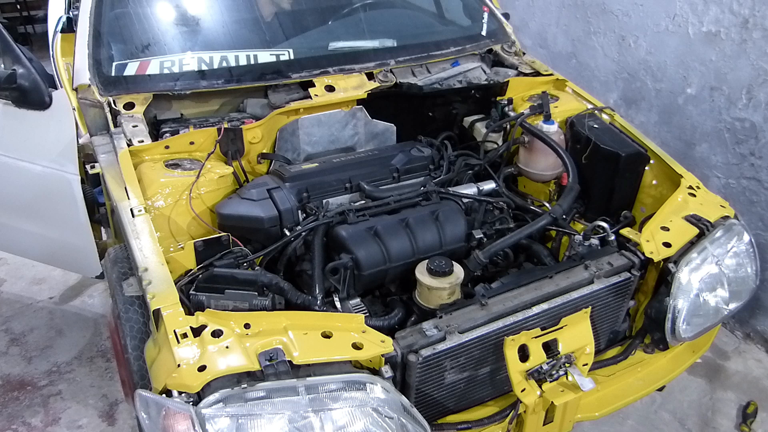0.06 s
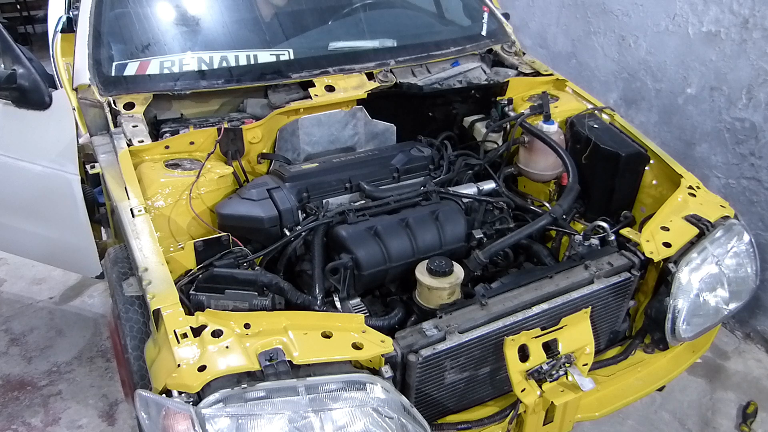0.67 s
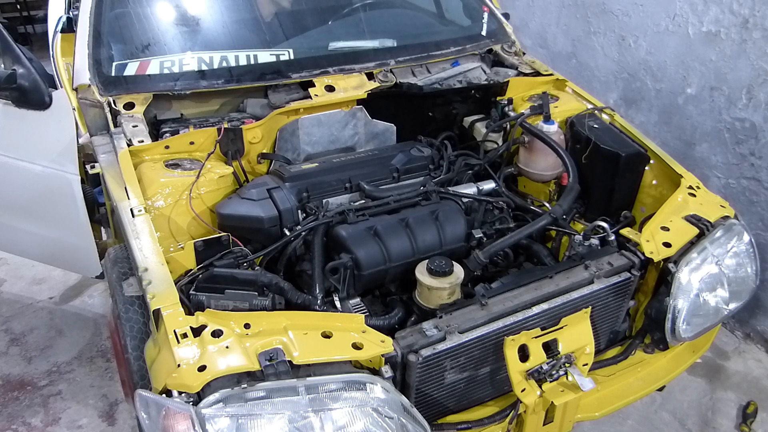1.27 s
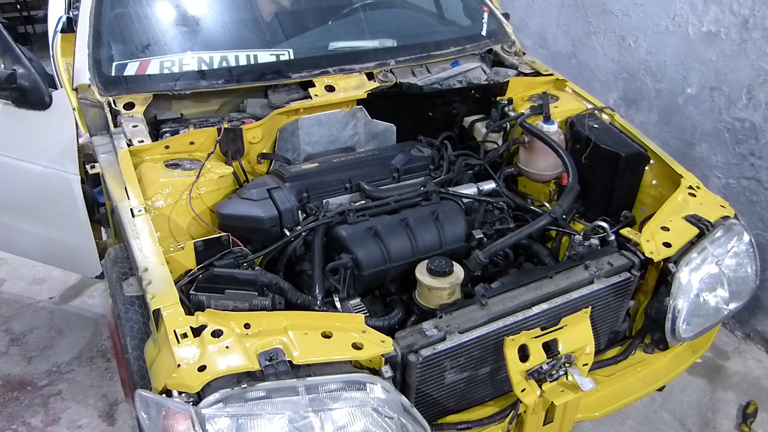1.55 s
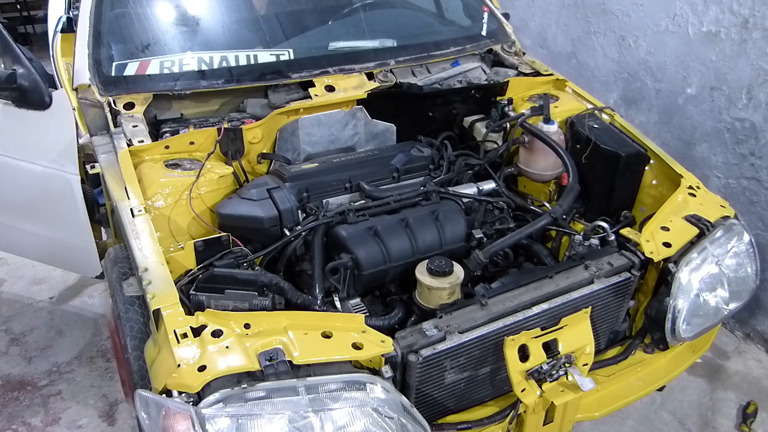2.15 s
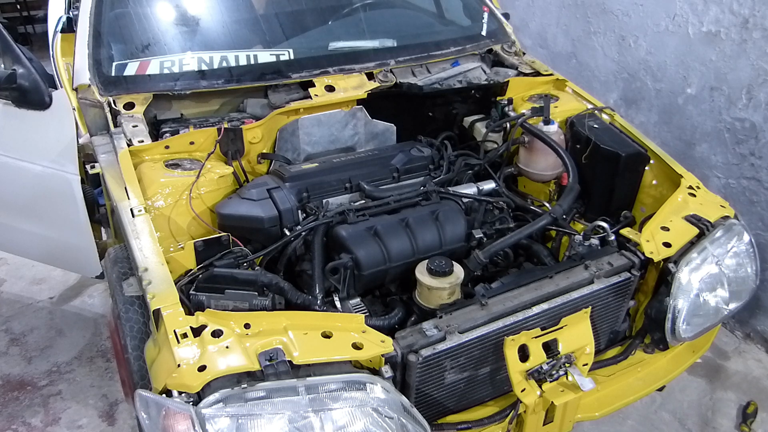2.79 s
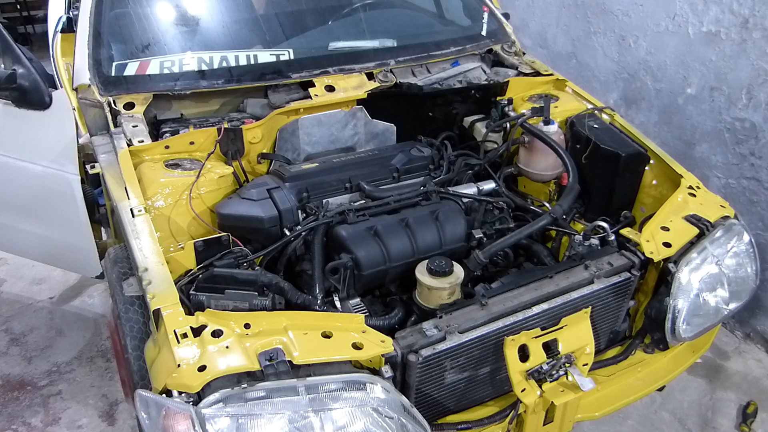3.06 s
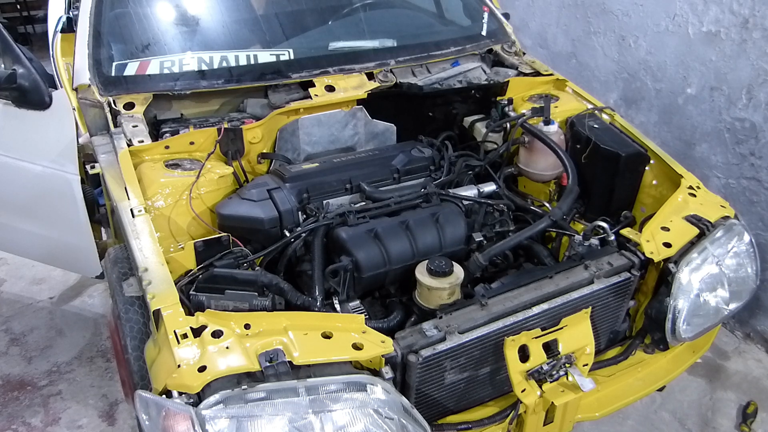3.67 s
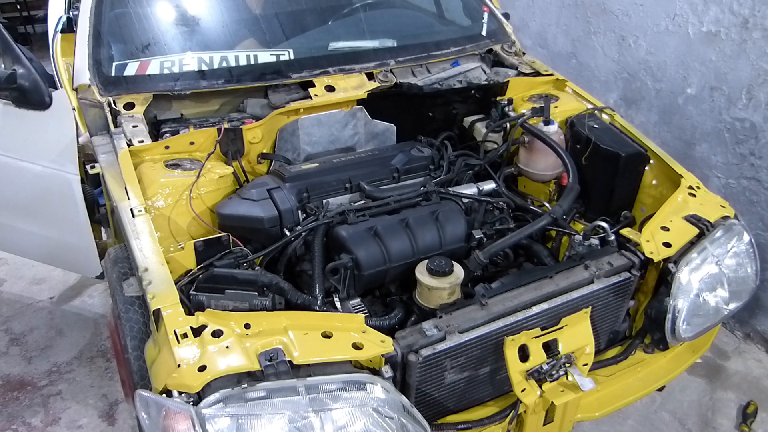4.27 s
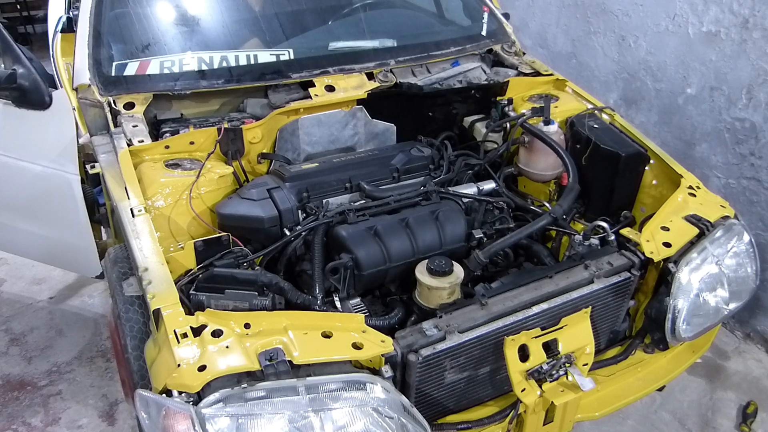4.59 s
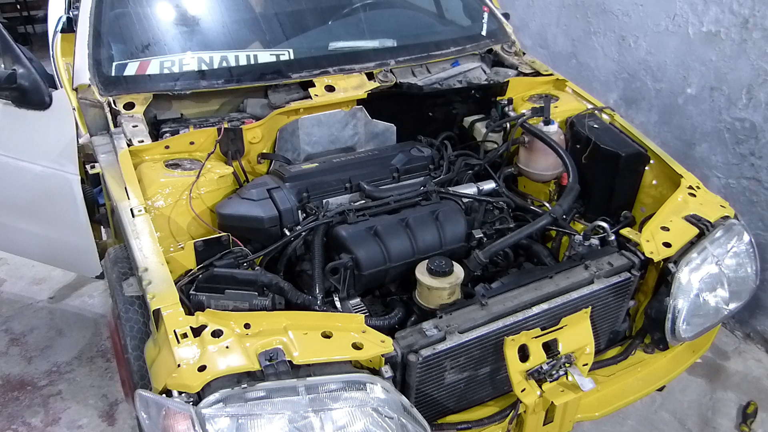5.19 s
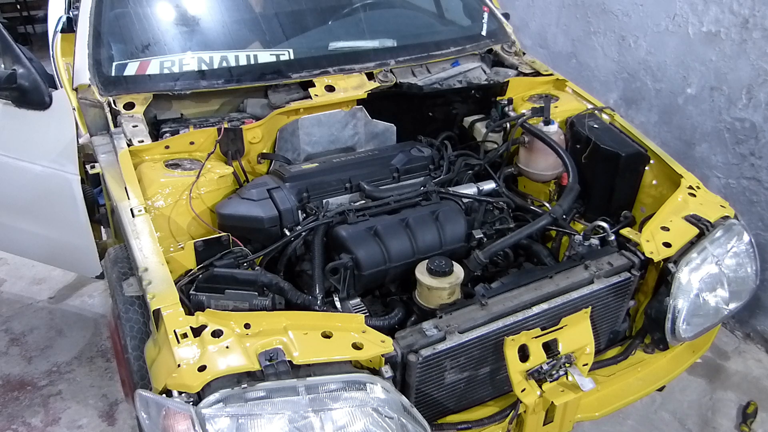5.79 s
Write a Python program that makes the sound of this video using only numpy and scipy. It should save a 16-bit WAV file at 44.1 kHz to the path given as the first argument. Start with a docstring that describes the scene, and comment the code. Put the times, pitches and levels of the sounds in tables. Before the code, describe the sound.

A car's starter motor cranks with a fast, even pulsing whine, winds down, then cranks again after a clunk, the engine never firing.

```python
"""A starter motor cranks a four-cylinder petrol engine in a garage, bonnet off; it never fires.
Each compression loads the gears: the teeth clash, and their whine sags with the speed before they run
light again. Tooth contact is the excitation; fixed peaks of the starter and its nearby echoes colour it.
The key is let go, the starter coasts and the engine rocks to rest, ringing its block. A relay clunks,
the fuel pump hums, and cranking starts again. The garage adds a short reverberation."""
import sys
import numpy as np
from scipy import signal
from scipy.fft import rfft, irfft, next_fast_len
from scipy.io import wavfile
from scipy.ndimage import uniform_filter1d, minimum_filter1d, map_coordinates

SR = 44100
rng = np.random.default_rng(int(sys.argv[2]) if len(sys.argv) > 2 else 0)


def wrap_up_sound(samples):
    """Save the sound to the file named by the first command line argument, as 16-bit audio."""
    columns = np.atleast_2d(samples).T
    # keep every value between -1 and 1, then stretch to whole-number steps
    tamed = np.clip(columns, -1, 1)
    steps = np.round(tamed * 32767).astype(np.int16)
    wavfile.write(sys.argv[1], SR, steps)


N = 266364
TIME = np.arange(N) / SR
SWITCH_ON_S = 5.239  # the starter is powered again

# turns of the key: (first compression [s], end [s], stroke period [s], strain of starting from rest [0-1])
KEY_TURNS = [(-.049, 3.42, .10545, 0), (5.498, 6.04, .1105, 1)]
# cylinders in order of compression: (clash level [dB], whine level [dB])
CYLINDER_LEVELS = [(-14.4, -19.2), (-14.2, -18.6), (-14.4, -19.2), (-14.1, -19.4)]
# fixed narrow ringing peaks of the starter and its nearby echoes: (frequency [Hz], width [Hz], lift [dB])
RINGING_PEAKS = [(295, 70, 3.5), (395, 50, 4.5), (576, 61, 4.5), (690, 60, 4.5), (785, 70, 4),
                 (1355, 50, 6), (2218, 24, 9), (2353, 24, 10), (2492, 20, 10), (2563, 30, 8), (2789, 36, 6),
                 (2993, 36, 4), (3165, 36, 5), (4124, 54, 7), (4570, 70, 2), (4726, 44, 5), (4829, 44, 9),
                 (4971, 25, 5), (5200, 40, 4), (5324, 44, 6), (5652, 36, 4), (6056, 26, 7), (7750, 50, 6),
                 (9370, 34, 9)]


def cranking():
    """Periodic loading: each compression slows the starter and modulates the level of its gear sounds."""
    # course of a stroke: (time since take-up [s], clash level [dB], whine level [dB], whirr level [dB])
    stroke_levels = [(0, -7.5, -2, -5.5), (.007, -1, 1, 2), (.018, -.5, -2, 1.5), (.028, -4, -3, 0.5),
                     (.042, -9.5, -2.5, 0.5), (.056, -9.5, -9.5, 1.5), (.07, -18.5, -7, 1),
                     (.088, -15, -21, 0), (.15, -20, -25, 5.5)]
    # slowing and recovery under load: (time since take-up [s], speed [ratio])
    speed_sag = [(0, 1.11), (.006, 1.08), (.016, 1.025), (.027, .985), (.04, .93), (.052, .88), (.066, .98),
                 (.085, .98), (.1, 1.02)]
    strokes = compressions()
    current = np.clip(np.searchsorted(strokes[0], TIME) - 1, 0, strokes.shape[1] - 1)
    start, cylinder, strain, count = strokes[:, current]
    whine_scatter, speed_scatter, clash_scatter = rng.standard_normal((strokes.shape[1], 3))[current].T
    age = (TIME - start) / (1 + .23 * strain)  # strain draws the stroke out
    engaged = np.interp(age, [.11, .15], [1, 0])  # the load fades when no further stroke follows

    clash_db, whine_db, whirr_db = curves(stroke_levels, age)
    cylinder_clash_db, cylinder_whine_db = np.array(CYLINDER_LEVELS)[cylinder.astype(int)].T
    clash_db += cylinder_clash_db - .05 * count + .7 * clash_scatter  # softens from stroke to stroke
    piston_climb = np.interp(age, [.01, .046, .058, .068], [0, 1, 1, 0])
    whine_db += cylinder_whine_db + strain * (11 * piston_climb - 4.5) + .15 * whine_scatter

    motor_hz, motor_whirr, motor_whine, slack = starter_motor(strain)
    drag = .16 * strain * np.minimum(age / .04, 1)  # share of speed lost to strain
    speed_change = curves(speed_sag, age)[0] - 1 - drag + .012 * speed_scatter
    pitch_hz = motor_hz * (1 + engaged * speed_change)
    mesh_hz = .28 * pitch_hz  # ring gear teeth pass more slowly than the reduction gear's
    clash = tooth_clash(mesh_hz, engaged * amp(clash_db))
    whirr = pinion_whirr(mesh_hz, engaged * whirr_db, motor_whirr, slack)
    whine = gear_whine(pitch_hz, np.hypot(engaged * amp(whine_db), motor_whine), slack, strain)
    return clash + whirr + whine + brush_squeal(age, engaged)


def compressions():
    """A near-periodic beat, slow at first from rest: start [s], cylinder, strain, count of each stroke."""
    tiring_s, strain_lag_s = .000056, .0295  # the tiring battery and the strain lengthen the period
    count = np.arange(40)
    turns = []
    for first, end, period, from_rest in KEY_TURNS:
        strain = from_rest * .2 ** count
        gaps = period + tiring_s * count + strain_lag_s * strain
        starts = first + np.cumsum(gaps) - gaps
        turns.append(np.array([starts, count % len(CYLINDER_LEVELS), strain, count])[:, starts < end])
    return np.hstack(turns)


def starter_motor(strain):
    """Rotor inertia: the motor coasts and spins up gradually. Gives pitch, whirr, whine and tooth slack."""
    # whirr while coasting: (time [s], level [dB])
    coast_levels = [(3.4, -16), (3.44, -19), (3.52, -27.5), (3.59, -27), (3.79, -30.5), (3.89, -38.5),
                    (4.13, -39), (4.39, -46), (4.6, -55.5), (5.23, -80)]
    # the spin-up whine swells, then recedes as the load nears: (time [s], relative level [dB])
    spin_swell = [(5.24, -30), (5.31, -12), (5.36, -1), (5.41, 0), (5.44, -4), (5.5, -3)]
    crank_hz, spin_hz, coast_hz_per_s, spin_up_s = 1264.5, 1550, 780, .06
    released, taken_up = KEY_TURNS[0][1], KEY_TURNS[1][0]
    coasting = (TIME > released) & (TIME <= SWITCH_ON_S)
    spinning = (TIME > SWITCH_ON_S) & (TIME < taken_up)
    by_state = lambda coast, spin, crank: np.select([coasting, spinning], [coast, spin], crank)
    powered_s = np.clip(TIME - SWITCH_ON_S, 0, taken_up - SWITCH_ON_S)
    speed = 1 - np.exp(-powered_s / spin_up_s)
    coast_hz = np.maximum(crank_hz - coast_hz_per_s * (TIME - released), 300)
    coast_whirr = amp(curves(coast_levels)[0])
    pitch_hz = by_state(coast_hz, spin_hz * speed, crank_hz)
    whirr = by_state(coast_whirr, speed * amp(-25.5 + 19 * powered_s), amp(-19.5 - 2 * strain))
    whine = by_state(coast_whirr * amp(-15), amp(-26.5 + curves(spin_swell)[0]), amp(-34.5))
    slack = by_state(coast=.55, spin=1, crank=0)
    return pitch_hz, whirr, whine, slack


def tooth_clash(mesh_hz, level):
    """Impact excitation: loaded teeth strike at the mesh rate and excite the fixed ringing peaks."""
    # clash spectrum: (frequency [Hz], relative density [dB])
    spectrum = [(60, -74), (215, -18.5), (300, -7.5), (600, -4.5), (1200, 3.5), (1900, 1), (3300, 4),
                (5000, 3), (7000, 1), (8500, -3), (10500, -10), (12500, -18), (15500, -53)]
    strikes = noise() * tooth_pulses(mesh_hz, decay_db=-1.5, scatter_db=1.1)
    return driven(strikes, level, spectrum, RINGING_PEAKS)


def pinion_whirr(mesh_hz, stroke_db, level, slack):
    """Forced vibration: tooth noise rings the pinion, more clearly when it runs unloaded."""
    # whirr spectra, driving and unloaded: (frequency [Hz], relative density [dB])
    loaded_spectrum = [(60, -62), (210, -18.5), (300, -4.5), (700, -4.5), (1500, 0), (2500, 0), (3400, -1),
                       (5000, 0), (6800, 2), (8500, -6), (10500, -13), (12500, -28), (15500, -35)]
    free_spectrum = [(60, -38), (190, -19), (330, -1), (700, 1), (1500, 5.5), (2400, 3.5), (3000, 5),
                     (5000, 3), (6800, 4.5), (8500, -1.5), (10500, -9), (12500, -25), (15500, -31)]
    # pinion resonances, driving and unloaded: (frequency [Hz], bandwidth [Hz], lift [dB])
    loaded_modes = [(720, 160, 4), (1400, 160, 1), (3450, 450, -3), (4150, 170, 4), (4400, 150, -2),
                    (4760, 220, 4), (7200, 50, 3), (7564, 22, 7)]
    free_modes = [(730, 140, 3), (1600, 260, 3), (3500, 500, -4), (4130, 130, 5), (4430, 200, -3),
                  (4820, 190, 6), (6200, 160, 4), (7180, 160, 6)]
    rasp = noise() * tooth_pulses(2 * mesh_hz, decay_db=2.5, scatter_db=.1)
    rasp *= amp(stroke_db + 1.35 * wobble(40))
    loaded = driven(rasp, level * (slack == 0), loaded_spectrum, loaded_modes)
    free = driven(rasp, level * (slack > 0), free_spectrum, free_modes)
    return loaded + free


def tooth_pulses(rate_hz, decay_db, scatter_db):
    """Amplitude modulation: each tooth has its own force, which ramps by -decay_db until the next."""
    passed = np.cumsum(rate_hz * (1 + .06 * wobble(150))) / SR
    force_db = scatter_db * rng.standard_normal(N // 8)
    return unit(amp(force_db[passed.astype(int)] - decay_db * (passed % 1)))


def gear_whine(pitch_hz, level, slack, strain):
    """Gear-mesh tones sweep through the fixed ringing peaks; slack teeth rasp and lose overtones."""
    # partials of the reduction gear: (frequency [multiple of the pitch], relative level [dB])
    partials = [(1, -7), (2, 4.5), (3, -12), (3.76, -2.5), (5, -9)]
    # how the starter radiates the whine: (frequency [Hz], relative gain [dB])
    radiation = [(500, 0), (1100, -4), (1400, 2.5), (1750, 1), (2000, 2), (2300, .8), (2550, -1), (2800, 1),
                 (3050, -1.5), (4100, 0), (4400, -3), (4650, -.5), (4830, 1), (5250, 1), (5700, -3),
                 (9000, -8)]
    gear_teeth, runout_rad, runout_depth = 9, .3, .5  # the gear runs out of true once per turn
    backlash = 1 + (.022 + .055 * slack + .03 * np.sqrt(strain)) * wobble(520) + .005 * wobble(25)
    phase = 2 * np.pi * np.cumsum(pitch_hz * backlash) / SR
    shaft_angle = phase / gear_teeth + wobble(60)
    phase += runout_rad * (1 + 2 * slack + strain) * np.sin(shaft_angle)
    tone = np.zeros(N)
    for order, db in partials:
        strength = amp(db - 24 * slack * (order > 1) + 2.5 * wobble(300) + 1.5 * wobble(25))
        tone += strength * np.sin(order * phase + .3 * wobble(160))
    tone *= 1 + runout_depth * np.cos(shaft_angle)
    tone /= np.sqrt(np.abs(uniform_filter1d(tone ** 2, size=1024)) + 1e-9)  # evens out slow swells
    milder_peaks = [(hz, width, .8 * db) for hz, width, db in RINGING_PEAKS]
    tone = driven(tone, level, radiation, milder_peaks)
    return .95 * tone + .3 * reverberation(tone, [(1000, .03), (8000, .02)], length=4096)


def brush_squeal(age, engaged):
    """Narrow-band noise: the brushes squeal thinly, most as the load lets go."""
    # squeal spectrum: (frequency [Hz], relative density [dB])
    spectrum = [(6300, -60), (6640, -18), (6662, 0), (6685, -18), (7000, -60)]
    swell = np.interp(age, [.035, .05, .08, .1], [.4, 1, 1, .4])
    return engaged * swell * amp(-34.5 + 2 * wobble(5)) * unit(colour(noise(), spectrum))


def take_up_knocks():
    """Backlash: the teeth knock together just before they take up each load."""
    lead_s, db, rise_s, t60_s, tilt_db = .004, -23.5, .002, .07, -1
    return impacts([(s - lead_s, db, rise_s, t60_s, tilt_db, 0) for s in compressions()[0] if s > 0])


def booms():
    """Low resonances as Gaussian tone bursts: each cylinder chugs in its own way, and the body bumps."""
    # block and intake, a list per cylinder: (frequency [Hz], time since take-up [s], width [s], level [dB])
    cylinder_booms = [
        [(172.4, 0.0178, 0.02, -42.5), (283, 0.0217, 0.012, -35), (125, .07, 0.026, -48)],
        [(293, 0.016, 0.012, -35), (309, .046, 0.014, -36)],
        [(176, 0.0237, 0.015, -40.5), (290, 0.02403, 0.019, -35)],
        [(124, 0.0274, 0.019, -45), (315, 0.034, 0.019, -46)],
    ]
    # dull bumps of the car's body: (time [s], frequency [Hz], width [s], level [dB])
    body_bumps = [(2.115, 62, .016, -49), (3.52, 66, .022, -50)]
    bursts = list(body_bumps)
    for start, cylinder, strain, _ in compressions().T:
        for hz, delay, width, db in cylinder_booms[int(cylinder)]:
            bursts.append((start + delay, hz, width, db - 10 * strain))
    out = np.zeros(N)
    for peak_s, hz, width, db in bursts:
        louder, higher, phase = rng.standard_normal(3)
        near = np.abs(TIME - peak_s) < 3 * width
        t = TIME[near] - peak_s
        tone = np.sqrt(2) * np.sin(2 * np.pi * (hz * (1 + .025 * higher) * t + phase))
        out[near] += amp(db + louder) * np.exp(-(t / width) ** 2) * tone
    return out


def engine_rocking():
    """Damped free vibration: the engine rocks to rest, and each blow rings its block."""
    # blows: (time [s], level before the block [dB], decay time t60 [s])
    rocks = [(3.622, -21, 0.39), (3.705, -27, 0.28), (3.86, -24.5, 0.63), (4.085, -32, 0.32),
             (4.128, -36.5, 0.43)]
    # broad response of the block: (frequency [Hz], gain [dB])
    block_response = [(100, 11), (220, -4), (400, -1.5), (1000, -8), (3000, 1.5), (9000, 3.5)]
    # resonances of the block: (frequency [Hz], bandwidth [Hz], lift [dB])
    block_modes = [(380, 80, 5), (665, 130, 4), (1120, 70, 3), (1370, 40, 4), (1590, 70, 5), (1830, 50, 4),
                   (2145, 45, 7), (2330, 40, 6), (3070, 70, 7), (3810, 50, 4), (4130, 70, 6), (4780, 80, 5)]
    rise_s, tilt_db, ring_db = .01, -1.46, 4.5
    blows = impacts([(s, db, rise_s, t60, tilt_db, ring_db) for s, db, t60 in rocks])
    return colour(blows, block_response, block_modes)


def drive_squeals():
    """The drive groans and squeals as the engine rocks back: glides roughened by frequency modulation."""
    # (time [s], duration [s], first pitch [Hz], last pitch [Hz], roughness [share of pitch], level [dB])
    glides = [(3.535, 0.085, 4780, 4830, .024, -32), (3.545, .07, 1540, 1620, .07, -35),
              (3.625, 0.075, 1570, 1640, .06, -33), (3.625, 0.09, 720, 660, .13, -33.5),
              (3.695, 0.08, 1970, 2220, 0.08, -30), (3.74, .1, 2320, 2335, .03, -41),
              (3.865, 0.12, 700, 640, .14, -39), (3.98, .5, 4150, 4110, .012, -51)]
    out = np.zeros(N)
    for start, duration, first_hz, last_hz, roughness, db in glides:
        progress = np.clip((TIME - start) / duration, 0, 1)
        hz = (first_hz + (last_hz - first_hz) * progress) * (1 + roughness * wobble(500))
        tone = np.sin(2 * np.pi * np.cumsum(hz) / SR) * amp(1.5 * wobble(300))
        out += amp(db) * np.sin(np.pi * progress) * unit(tone)
    return out


def switch_clunks():
    """Impact transients: the relays and the starter solenoid snap over."""
    # (time [s], level [dB], rise [s], decay time t60 [s], tilt [dB/octave], panel ring [dB])
    clunks = [(4.593, -30, 0.002, 0.3, -2, 10), (4.602, -32, 0.0049, 0.14, -5, 17),
              (4.753, -40.5, .0033, 0.23, 16, 0), (4.765, -37, .01, 0.24, -6.5, -2),
              (5.24, -11.5, 0.01, 0.21, 3.5, 0.5)]
    return impacts(clunks)


def impacts(rows):
    """Exponential decay: heavy metal parts clatter in bursts of noise; some ring the body panel."""
    # spectrum of a knock: (frequency [Hz], relative density [dB])
    spectrum = [(50, -50), (130, -12.5), (300, -3.5), (800, 2.5), (1300, 5.5), (2100, 0.5), (3200, -5.5),
                (6000, -2.5), (9000, -11), (12000, -28.5), (15500, -41)]
    # resonances of the body panel: (frequency [Hz], bandwidth [Hz], share of the ring [0-1])
    panel_modes = [(215, 40, .8), (834, 200, 1), (1740, 160, .6), (2250, 400, .6)]
    out = np.zeros((2, N + SR))
    size = SR // 2
    t = np.arange(size) / SR
    hz = np.fft.rfftfreq(size, 1 / SR)
    octaves = np.log2(np.clip(hz, 120, 9000) / 1000)
    panel = sum(share / (1 + (2 * (hz - centre) / width) ** 2) for centre, width, share in panel_modes)
    rattle = noise() * amp(.88 * wobble(250))
    for s, db, rise, t60, tilt_db, ring_db in rows:
        span = slice(round(s * SR), round(s * SR) + size)
        gain = amp(along(spectrum, hz) + tilt_db * octaves + ring_db * panel)
        body = unit(irfft(rfft(rattle[:, span], size) * gain, size))
        envelope = np.minimum(t / rise, 1) * amp(db - 60 * np.maximum(t - rise, 0) / t60)
        out[:, span] += body * envelope
    return out[:, :N]


def fuel_pump():
    """Flow noise and tones: the pump hums, and fuel rushes and whistles thinly as it primes the rail."""
    # rush of fuel: (frequency [Hz], relative density [dB])
    rush_spectrum = [(40, -29), (72, -5), (100, -7), (140, -16), (220, 1.5), (400, -2.5), (700, 2.5),
                     (1100, 3.5), (1900, -3.5), (3000, -12), (4700, -10), (7000, -19), (10000, -27),
                     (15000, -61)]
    # low hums while the starter is off: (start [s], end [s], frequency [Hz], level [dB])
    hums = [(3.68, 4.26, 114, -50), (4.28, 4.8, 145, -55.5), (4.36, 4.92, 86, -59),
            (4.95, 5.25, 145, -49.5)]
    prime_s, ramp_s = 4.57, .032
    whistle_s, settle_s, whistle_hz = 4.83, .05, 4715
    running = lambda start, end: np.clip(np.minimum(TIME - start, end - TIME) / ramp_s + .5, 0, 1)
    out = running(prime_s, SWITCH_ON_S) * amp(-42.5) * unit(colour(noise(), rush_spectrum))
    for start, end, hz, db in hums:
        phase = 2 * np.pi * np.cumsum(hz * (1 + .025 * wobble(24))) / SR
        out += running(start, end) * amp(db) * unit(np.sin(phase) * amp(2.5 * wobble(16)))
    settled = 1 - np.exp(-np.maximum(TIME - whistle_s, 0) / settle_s)
    phase = 2 * np.pi * np.cumsum(whistle_hz * (1 - .08 * (1 - settled) + .006 * wobble(300))) / SR
    whistle = amp(-64) * unit(np.sin(phase)) + amp(-79) * unit(np.sin(3 * phase))
    return out + settled * (TIME < SWITCH_ON_S) * whistle


def reverberation(x, t60s, length):
    """Diffuse field: convolution with a stereo noise tail in which each frequency dies at its own rate."""
    hz, t, bins = signal.stft(rng.standard_normal((2, length)), SR, nperseg=256)
    tail = signal.istft(bins * amp(-60 * t / along(t60s, hz)[:, None]), SR, nperseg=256)[1]
    return signal.fftconvolve(np.atleast_2d(x), tail / np.linalg.norm(tail[0]), axes=1)[:, :N]


def background():
    """Stationary noise: the quiet, dull ambience of the garage."""
    # ambient spectrum: (frequency [Hz], relative density [dB])
    spectrum = [(20, -2), (45, -27), (75, -15), (130, -8.5), (250, -5.5), (700, -4.5), (1500, -10),
                (3000, -24), (8000, -30), (15000, -58)]
    return amp(-41.5) * unit(colour(noise(), spectrum))


def driven(x, level, spectrum, peaks):
    """Source and filter: an excitation at a moving level is coloured; the rms of that level is kept."""
    return unit(colour(x * level, spectrum, peaks)) * np.sqrt(np.mean(level ** 2))


def colour(x, spectrum, peaks=()):
    """Minimum-phase filter: a smooth spectrum lifted by ringing peaks."""
    size = 2 * next_fast_len(N // 2 + 8192)
    hz = np.fft.rfftfreq(size, 1 / SR)
    lift = sum((amp(db) ** 2 - 1) / (1 + (2 * (hz - centre) / width) ** 2) for centre, width, db in peaks)
    gain = amp(along(spectrum, hz)) * np.sqrt(np.maximum(1 + lift, 1e-3))
    cepstrum = irfft(np.log(gain + 1e-6))
    cepstrum[1:size // 2] *= 2  # folding the cepstrum makes the filter causal
    cepstrum[size // 2 + 1:] = 0
    return irfft(rfft(x, size) * np.exp(rfft(cepstrum)), size)[..., :N]


def noise():
    """Partial coherence: white stereo noise, partly shared by left and right."""
    # left-right likeness: (frequency [Hz], correlation [0-1])
    correlation = [(60, 0.92), (120, 0.84), (240, 0.87), (480, 0.6), (950, 0.74), (1890, 0.87),
                   (3770, 0.89), (7520, 0.79), (15000, 0.11)]
    size = next_fast_len(N)
    angle = np.arccos(np.clip(along(correlation, np.fft.rfftfreq(size, 1 / SR)), 0, 1)) / 2
    white = rfft(rng.standard_normal((2, size)))
    mid, side = irfft(white * [np.cos(angle), np.sin(angle)], size)[:, :N]
    return unit(np.array([mid + side, mid - side]))


def wobble(rate):
    """A smooth random curve, rate knots a second."""
    return map_coordinates(rng.standard_normal(int(N * rate / SR) + 4), [TIME * rate])


def curves(rows, at=TIME):
    """Linear interpolation in time of each column after the first."""
    times, *columns = np.transpose(rows)
    return [np.interp(at, times, column) for column in columns]


def along(points, hz):
    """Interpolation of (frequency [Hz], value) points on a log axis."""
    frequencies, values = np.transpose(points)
    return np.interp(np.log(hz + 1), np.log(frequencies + 1), values)


def amp(db):
    """Decibels to gain."""
    return 10 ** (np.asarray(db) / 20)


def unit(x):
    """Scale to rms 1."""
    return x / np.sqrt(np.mean(x ** 2) + 1e-20)


def scene():
    """Superposition: direct sound from the engine bay, the garage's reverberation and its background."""
    # reverberation of the garage: (frequency [Hz], decay time t60 [s])
    garage_decay = [(150, 0.27), (1000, 0.31), (5000, 0.12), (12000, 0.097)]
    bay = cranking() + booms() + drive_squeals() + engine_rocking()
    bay += switch_clunks() + fuel_pump() + take_up_knocks()
    room = amp(-8) * reverberation(bay, garage_decay, length=SR // 2)
    balance = amp([[-.2], [.2]])
    return (bay + room + background()) * balance


def record(dry):
    """Peak limiting and band limiting: the gain dips at the highest peaks, and the top treble is cut."""
    ceiling, top_hz = .95, 15700
    needed_gain = np.minimum(1, ceiling / (np.abs(dry).max(axis=0) + 1e-9))
    limited = dry * uniform_filter1d(minimum_filter1d(needed_gain, size=200), size=200)
    size = next_fast_len(N + 8192)
    passband = np.fft.rfftfreq(size, 1 / SR) < top_hz
    return irfft(rfft(limited, size) * passband, size)[:, :N]


dry = scene()
out = record(dry)
wrap_up_sound(out)
```